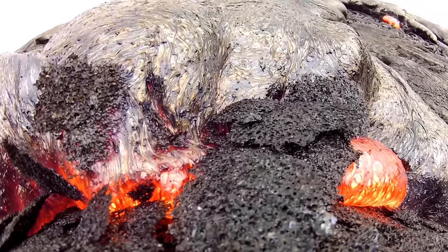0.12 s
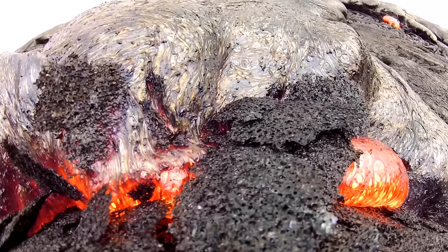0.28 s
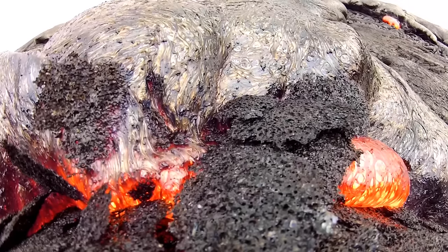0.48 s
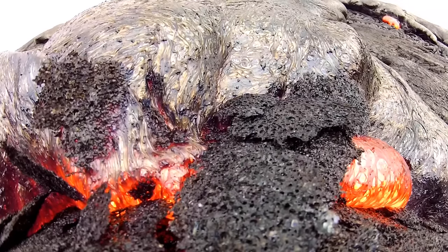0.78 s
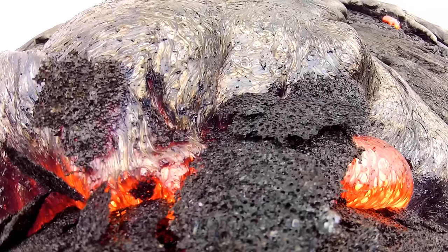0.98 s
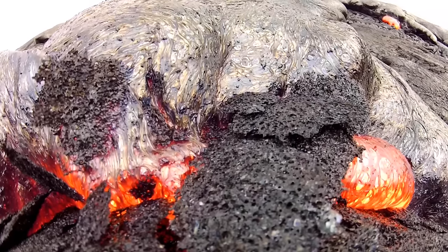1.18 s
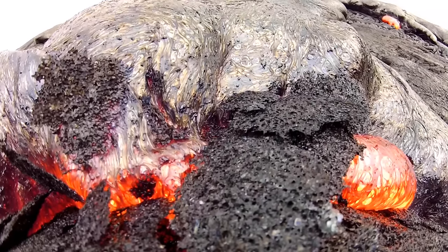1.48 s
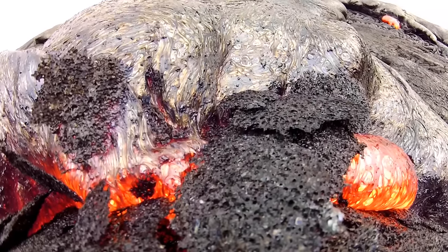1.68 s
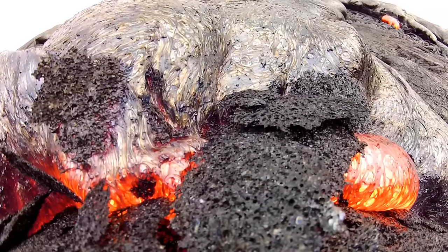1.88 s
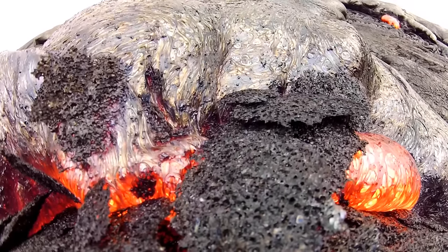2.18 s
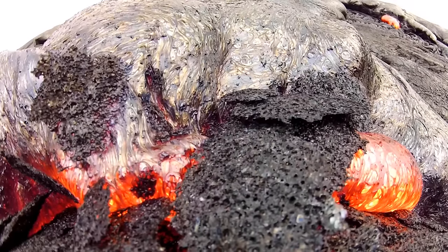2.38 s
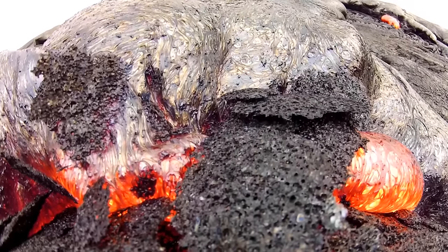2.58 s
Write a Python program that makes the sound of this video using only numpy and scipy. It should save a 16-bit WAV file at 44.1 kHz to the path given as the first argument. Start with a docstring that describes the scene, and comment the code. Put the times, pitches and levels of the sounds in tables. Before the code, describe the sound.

Cooling lava crust cracking and crumbling in short dry snaps over a faint rough hiss.

```python
"""Cooling lava, very close: its glassy crust snaps in short dry cracks and crumbles in spells.
Each fracture rings the hollow body of the crust and its brittle edges. A rough hiss of finer fractures
runs underneath, a few flakes tick, and light wind bumps the microphone. The crust's sound is stepped
(sample and hold), which mirrors it into a gritty treble. Both channels are the same."""
import sys
import numpy as np
from scipy import signal
from scipy.fft import rfft, irfft, next_fast_len
from scipy.io import wavfile
from scipy.ndimage import map_coordinates

SR = 44100
rng = np.random.default_rng(int(sys.argv[2]) if len(sys.argv) > 2 else 0)


def output_pcm(signal):
    """Save a mono or channel-first signal as 16-bit PCM at the path in sys.argv[1].

    Samples are clipped to [-1, 1] before scaling.
    """
    pcm = np.clip(np.atleast_2d(signal).T, -1, 1) * 32767
    wavfile.write(sys.argv[1], SR, np.round(pcm).astype(np.int16))


N = 119070

# The ringing tones of the hollow crust. Each row: pitch in Hz, width in Hz, relative level in dB.
BODY_TONES = [(498.8, 58, -5), (607, 119.7, -2.5), (767, 179.4, 0), (937, 118.6, -3.5), (959, 87, -8)]
# The ringing tones of its brittle edges. Each row: pitch in Hz, width in Hz, relative level in dB.
EDGE_TONES = [(1269, 92, -6), (1768, 68, -2), (2058, 98, 3.5), (2287, 119, 4.5), (2673, 70, -3),
              (2853, 107, -1.5), (3065, 164, -1.5), (3952, 260, -7), (4412, 690, -16.5)]


def amp(db):
    """Turn decibels into a gain to multiply by."""
    return 10 ** (np.asarray(db) / 20)


def unit(x):
    """Scale a sound so that its average level (rms) is 1."""
    return x / np.sqrt(np.mean(x ** 2) + 1e-20)


def gain_at(colour, hz):
    """Read the gain at any frequency from a curve of (Hz, dB) points."""
    points_hz, points_db = np.transpose(colour)
    return amp(np.interp(np.log(hz + 1), np.log(points_hz + 1), points_db))


def filtered(x, response):
    """Turn each frequency of a sound up or down by the gain that response gives for it."""
    size = next_fast_len(N + 8192)
    return irfft(rfft(x, size) * response(np.fft.rfftfreq(size, 1 / SR)), size)[..., :N]


def noise(colour):
    """Make noise of level 1, shaped by a curve of (Hz, dB) points."""
    return unit(filtered(rng.standard_normal(N), lambda hz: gain_at(colour, hz)))


def add(track, start, sound):
    """Mix a sound into a track at a start time in seconds."""
    part = track[round(start * SR):][:len(sound)]
    part += sound[:len(part)]


def ring(push, tones):
    """A push rings one piece of crust. Every piece rings a little differently."""
    t = np.arange(SR // 20) / SR
    hz, width, db = np.transpose(tones)[:, :, None]
    reach = 1.99  # the piece sounds about an octave beyond its lowest and highest tones
    band = signal.butter(2, [hz.min() / reach, hz.max() * reach], "bandpass", fs=SR, output="sos")
    db = db + 1.5 * rng.standard_normal(hz.shape)
    detune = 0.039 * rng.standard_normal()  # about 4 % for the lowest body tone, less higher up
    hz = hz * np.exp(detune * np.sqrt(BODY_TONES[0][0] / hz))
    signs = (-1) ** np.arange(len(tones))[:, None]
    fades = amp(db) * width * np.exp(-np.pi * width * t)  # wider tones die sooner
    ringing = np.sum(signs * fades * np.cos(2 * np.pi * hz * t), axis=0)
    return signal.fftconvolve(push, signal.sosfilt(band, ringing))[:len(push)]


def fractures(per_second, scatter_db, pieces=6):
    """Tiny fractures of uneven size ring several pieces of crust, giving a body and an edge sound."""
    body, edge = np.zeros((2, N))
    for _ in range(pieces):
        breaks = rng.random(N) < per_second / pieces / SR
        sizes = amp(scatter_db * np.minimum(rng.standard_normal(N), 2))
        pushes = breaks * sizes * rng.choice([-1, 1], N)
        body += ring(pushes, BODY_TONES)
        edge += ring(pushes, EDGE_TONES)
    return unit(body), unit(edge)


def hiss():
    """The whole surface keeps fracturing finely, which blurs into a rough hiss."""
    # How the hiss rises and falls. Each row: time in seconds, level in dB.
    levels = [(0, -50), (.3, -50.5), (.68, -56), (.92, -57), (1.15, -50.5), (1.49, -52), (1.69, -54),
              (2.3, -49), (2.5, -58.5), (2.65, -50.5)]
    body, edge = fractures(per_second=600, scatter_db=10)
    level_db = np.interp(np.arange(N) / SR, *np.transpose(levels))
    return amp(level_db) * (body + amp(-3.5) * edge)


def shaped(sound, shape):
    """Fade a sound in and out along a shape, giving it the same average level as that shape."""
    return unit(shape * sound) * np.sqrt(np.mean(shape ** 2))


def wind():
    """Light wind bumps the microphone over a faint rumble and a steady bed of air."""
    # The colour of the wind's low rumble. Each row: frequency in Hz, relative level in dB.
    rumble_colour = [(12, 3), (30, 3.5), (72, 10), (110, 0.5), (170, -4), (300, -20.5), (800, -111)]
    # The colour of the steady air. Each row: frequency in Hz, relative level in dB.
    air_colour = [(30, 0.5), (150, 2.5), (350, 1), (800, -12), (1300, -18.5), (3500, -21.5), (6000, -32),
                  (15000, -29)]
    # Bumps of wind on the microphone. Each row: start in seconds, length in seconds, level in dB.
    bumps = [(.51, 0.058, -46.5), (1.237, 0.11, -47.5), (1.655, 0.12, -41.5), (1.805, 0.23, -46),
             (2.076, 0.047, -39.5), (2.304, 0.056, -41)]
    ramp_s = 0.055
    t = np.arange(N) / SR
    bump_noise = noise(rumble_colour)
    out = amp(-59) * noise(rumble_colour) + amp(-55) * noise(air_colour)
    for start, length, db in bumps:
        inside_s = np.minimum(t - start, start + length - t)
        shape = np.clip(inside_s / ramp_s + 0.5, 0, 1)
        out += amp(db) * shaped(bump_noise, shape)
    return out


def cracks():
    """A snap and a brief rough tear ring the crust. Cracks with more edge sound more like a splinter."""
    # Single cracks. Each row: start in seconds, body level in dB, edge level in dB (before the boosts).
    snaps = [(0.058, -47.0, -48.0), (0.1285, -42.0, -45.0), (0.1439, -47.0, -41.0), (0.1929, -37.0, -41.0),
             (0.2357, -33.0, -36.0), (0.241, -30.0, -35.0), (0.2515, -39.0, -38.0), (0.3155, -43.0, -43.0),
             (0.327, -36.0, -49.0), (0.3487, -35.0, -44.0), (0.3924, -41.0, -51.0), (0.4608, -49.0, -37.0),
             (0.4906, -33.0, -43.0), (0.5138, -37.0, -42.0), (0.524, -40.0, -45.0), (0.5472, -37.0, -50.0),
             (0.586, -41.0, -49.0), (0.6169, -41.0, -45.0), (0.634, -44.0, -43.0), (0.665, -44.0, -48.0),
             (0.7341, -23.0, -22.0), (0.7454, -31.0, -39.0), (0.7802, -39.0, -40.0), (0.8356, -36.0, -52.0),
             (0.8625, -41.0, -47.0), (0.9612, -30.0, -31.0), (0.9785, -28.0, -33.0), (1.0352, -39.0, -41.0),
             (1.0601, -32.0, -43.0), (1.0997, -38.0, -49.0), (1.1576, -33.0, -42.0), (1.253, -37.0, -50.0),
             (1.2657, -38.0, -44.0), (1.39, -35.0, -45.0), (1.4335, -42.0, -50.0), (1.4696, -40.0, -54.0),
             (1.5197, -24.0, -35.0), (1.5452, -32.0, -43.0), (1.5577, -30.0, -40.0), (1.5809, -39.0, -44.0),
             (1.6006, -37.0, -43.0), (1.6195, -29.0, -46.0), (1.6307, -35.0, -47.0), (1.7185, -45.0, -46.0),
             (1.7319, -39.0, -38.0), (1.7971, -32.0, -38.0), (1.8071, -34.0, -41.0), (1.8608, -42.0, -39.0),
             (1.9041, -37.0, -40.0), (1.9372, -33.0, -44.0), (2.0065, -41.0, -55.0), (2.0246, -38.0, -48.0),
             (2.0416, -32.0, -56.0), (2.1517, -34.0, -52.0), (2.1646, -37.0, -50.0), (2.2013, -32.0, -33.0),
             (2.2488, -48.0, -44.0), (2.2624, -38.0, -49.0), (2.329, -46.0, -54.0), (2.4147, -39.0, -36.0),
             (2.462, -43.0, -37.0), (2.619, -46.0, -50.0), (2.681, -45.0, -49.0)]
    # The dry tones of a thin splinter. Each row: pitch in Hz, width in Hz, relative level in dB.
    splinter_tones = [(2917, 840, 2.5), (4150, 1200, -15)]
    body_boost_db, edge_boost_db = 0.36, 1.78
    tear_strength, tear_fade_s = 0.24, 0.0013
    out, t = np.zeros(N), np.arange(SR // 20) / SR
    crack_gain = np.sqrt(0.0069 / t[-1])  # levels count as if the whole crack fell within 6.9 ms
    for start, body_db, edge_db in snaps:
        push = tear_strength * rng.standard_normal(len(t)) * np.exp(-t / tear_fade_s)
        push[0] += rng.choice([-1, 1])  # the snap itself
        body, edge, splinter = (unit(ring(push, x)) for x in (BODY_TONES, EDGE_TONES, splinter_tones))
        splinter_share = 1 / (4 + np.exp((2 - edge_db + body_db) / 2.5))  # a quarter at most
        edge = unit(np.sqrt(1 - splinter_share) * edge + np.sqrt(splinter_share) * splinter)
        crack = amp(body_db + body_boost_db) * body + amp(edge_db + edge_boost_db) * edge
        add(out, start, crack_gain * crack)
    return out


def crumbling():
    """The crust crumbles in spells of dense fractures that swell, hold and die away."""
    # Spells of crumbling. Each row: start in seconds, length in seconds, body and edge levels in dB.
    spells = [(0.246, 0.028, -46, -41.5), (0.283, 0.046, -48, -50.5), (0.436, 0.044, -47, -45),
              (0.491, 0.081, -44.5, -47), (0.601, 0.057, -47.5, -52), (0.708, 0.056, -40, -46.5),
              (0.781, 0.023, -43.0, -47.5), (0.816, 0.068, -45.5, -54), (0.981, 0.064, -48, -55),
              (1.035, 0.056, -38.5, -47), (1.24, 0.019, -47, -47.5), (1.323, 0.019, -42, -49.5),
              (1.514, 0.048, -36, -48.0), (1.625, 0.03, -42.0, -69), (1.782, 0.026, -38.5, -46),
              (1.878, 0.1, -39.5, -47.5), (2.022, 0.054, -42, -51.5), (2.12, 0.033, -46.5, -58),
              (2.188, 0.033, -36, -42.5), (2.263, 0.015, -39, -50)]
    rise_s, fall_s = 0.0052, 0.0015
    out, t = np.zeros(N), np.arange(N) / SR
    body, edge = fractures(per_second=1000, scatter_db=4)
    for start, length, body_db, edge_db in spells:
        rise = np.clip((t - start) / rise_s + 0.5, 0, 1)
        fall = np.exp(-np.maximum(t - start - length, 0) / fall_s)
        out += amp(body_db) * shaped(body, rise * fall)
        out += amp(edge_db) * shaped(edge, rise * fall)
    return out


def flakes():
    """Thin flakes come off with a tick of noise and do not ring."""
    # Flakes ticking off. Each row: start in seconds, starting level in dB.
    ticks = [(0.2515, -24), (0.9346, -44), (2.1066, -38), (2.1214, -34)]
    # The bright colour of a tick. Each row: frequency in Hz, relative level in dB.
    tick_colour = [(200, -20), (1500, 5), (4000, -2), (7500, -10), (10000, -9), (15000, -25)]
    fade_s = 0.0005
    shape, t = np.zeros(N), np.arange(SR // 50) / SR
    for start, db in ticks:
        add(shape, start, amp(db) * np.exp(-t / fade_s))
    return shape * noise(tick_colour)


def rock_echo(x):
    """The rock around adds one near echo and a very short tail."""
    echo_s, echo_db = 0.01, -21.5
    tail_s, tail_db = 0.013, -10.5  # the tail fades by 60 dB in tail_s
    t = np.arange(SR // 6) / SR
    tail = rng.standard_normal(len(t)) * amp(-60 * t / tail_s) * np.minimum(t / echo_s, 1)
    reflections = amp(tail_db) * tail / np.linalg.norm(tail)
    add(reflections, echo_s, amp([echo_db]))
    return x + signal.fftconvolve(x, reflections)[:N]


def stepped(x):
    """Sample and hold: the sound is mirrored around the step rate as a gritty treble."""
    # The colour given to the cracks, crumbling and hiss. Each row: frequency in Hz, gain in dB.
    crust_colour = [(100, 14.5), (330, 0.5), (480, 0), (1200, 0), (2500, -5), (4000, -2), (5000, -6),
                    (5900, -26)]
    step_hz, mirror_db = 12000, 0.5

    def low_band(hz):
        """Colour the sound below half the step rate, making up for the dulling that holding adds."""
        dulling = np.sinc(np.minimum(hz / step_hz, 0.5))
        return gain_at(crust_colour, hz) * (hz < step_hz / 2) / dulling

    steps = 1 + 2 * amp(mirror_db) * np.cos(2 * np.pi * step_hz * np.arange(N) / SR)
    mirrored = filtered(x, low_band) * steps
    return filtered(mirrored, lambda hz: np.sinc(hz / step_hz))  # holding each step dulls the treble


def scene():
    """Mix the crust, flakes and wind, the same in both channels."""
    crust = cracks() + crumbling() + hiss()
    mono = stepped(rock_echo(crust)) + flakes() + wind()
    return np.array([mono, mono])


def record(dry):
    """Cut off the very highest treble steeply."""
    top_hz = 15450
    return filtered(dry, lambda hz: 1 / np.sqrt(1 + (hz / top_hz) ** 120))


dry = scene()
out = record(dry)
output_pcm(out)
```